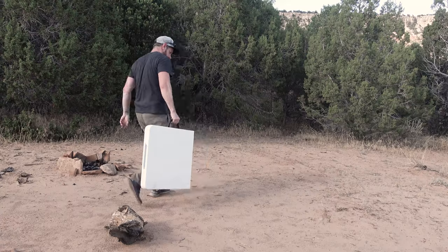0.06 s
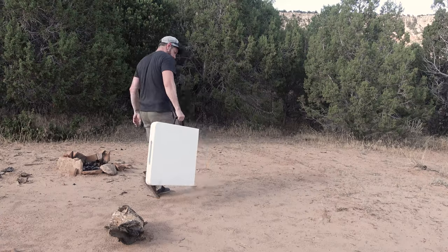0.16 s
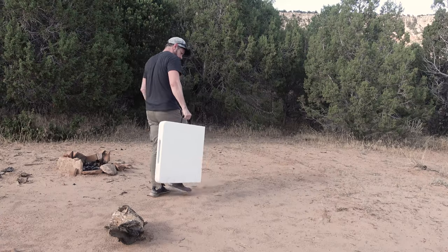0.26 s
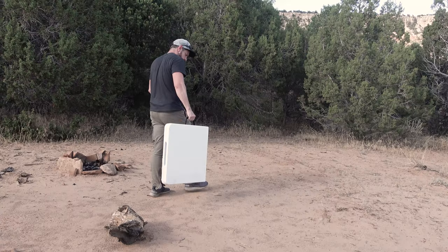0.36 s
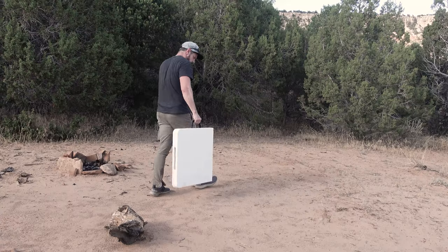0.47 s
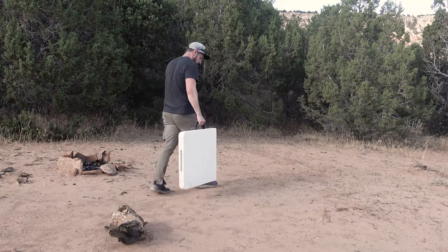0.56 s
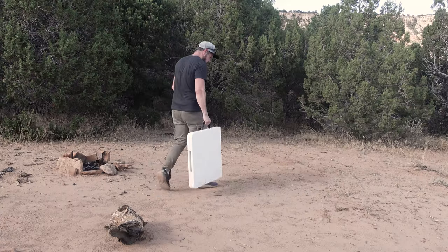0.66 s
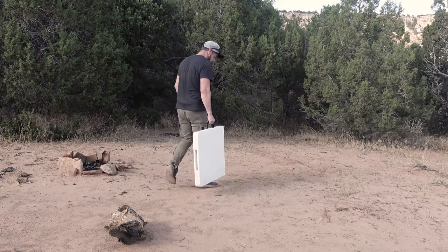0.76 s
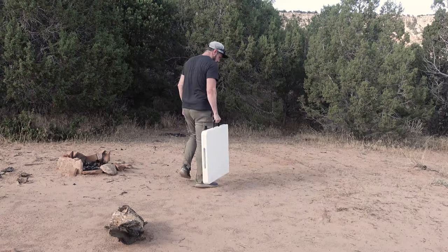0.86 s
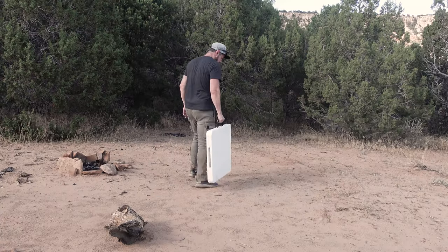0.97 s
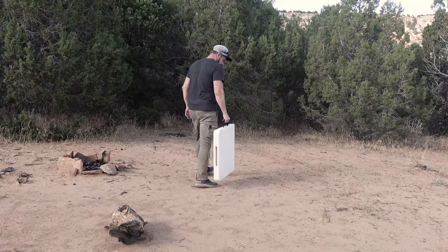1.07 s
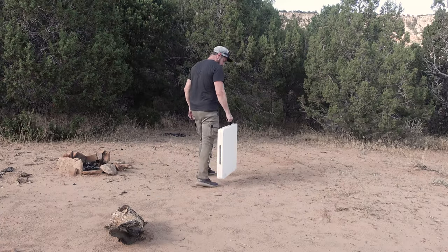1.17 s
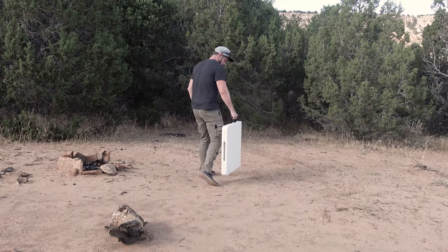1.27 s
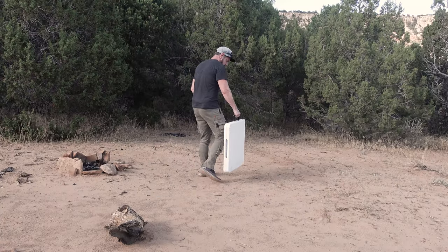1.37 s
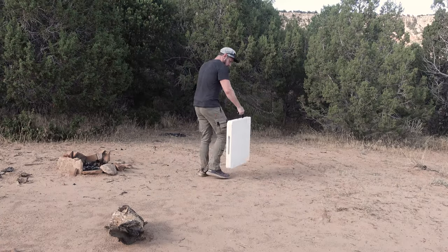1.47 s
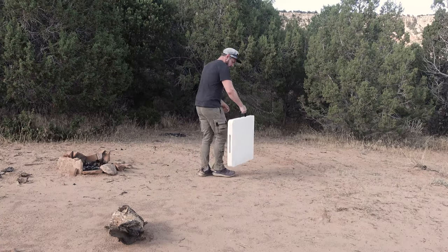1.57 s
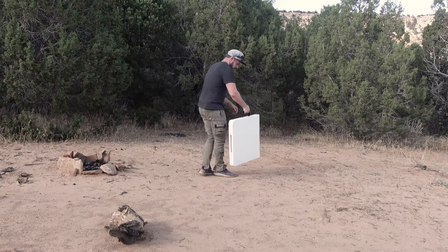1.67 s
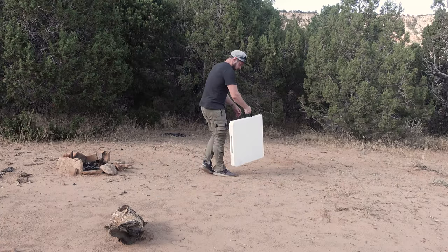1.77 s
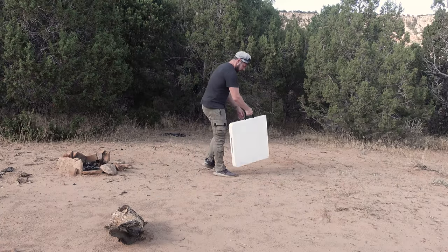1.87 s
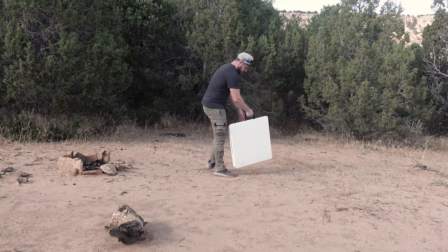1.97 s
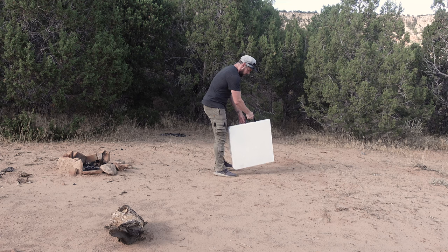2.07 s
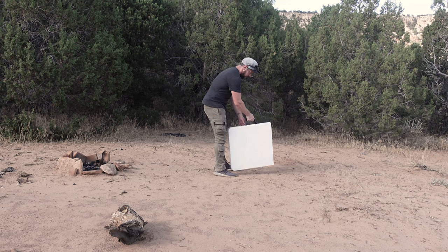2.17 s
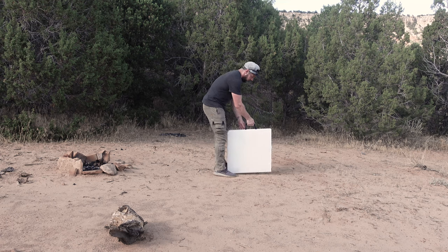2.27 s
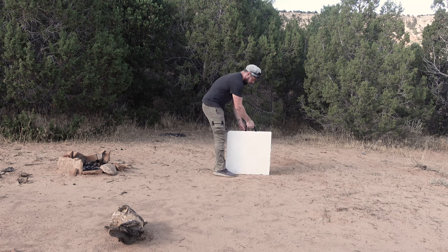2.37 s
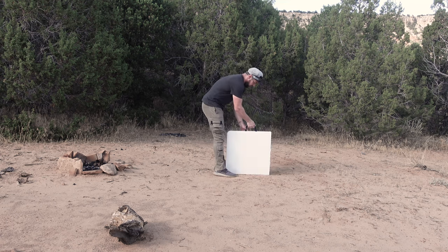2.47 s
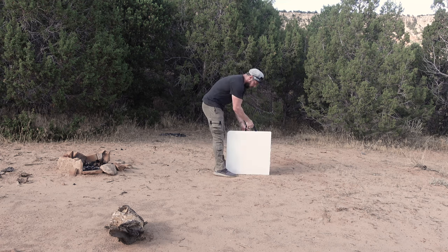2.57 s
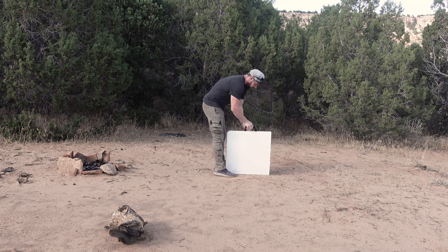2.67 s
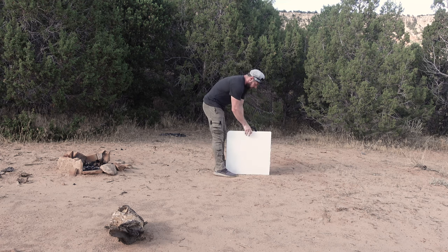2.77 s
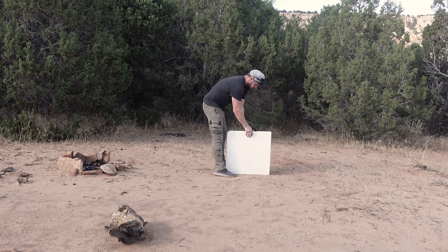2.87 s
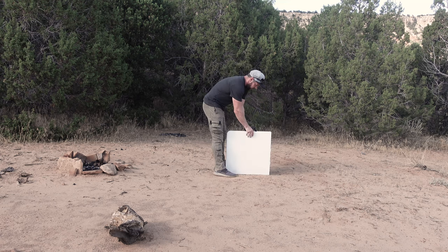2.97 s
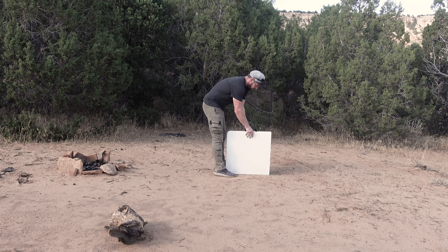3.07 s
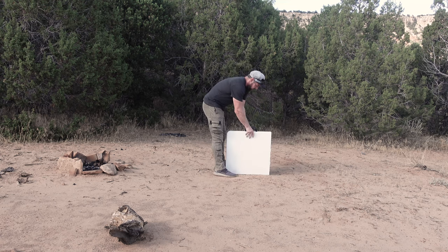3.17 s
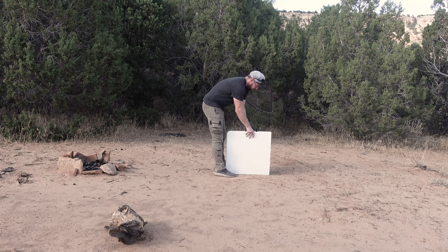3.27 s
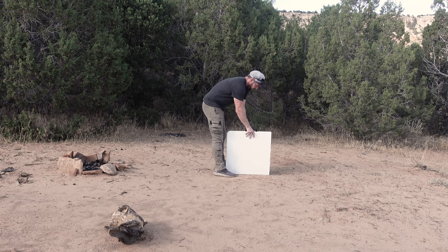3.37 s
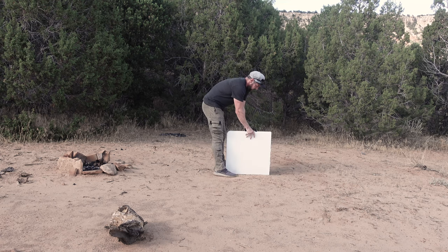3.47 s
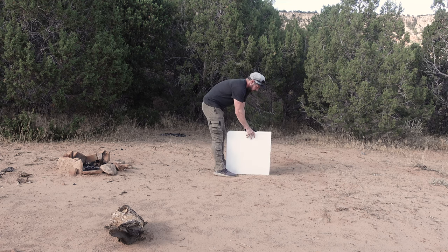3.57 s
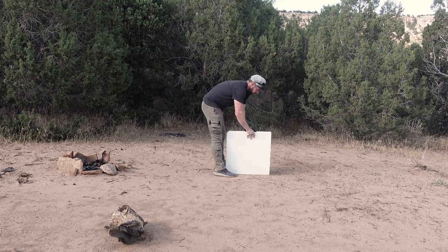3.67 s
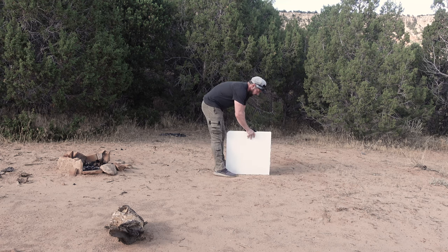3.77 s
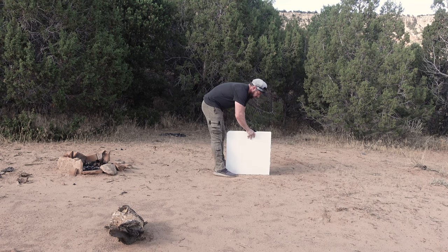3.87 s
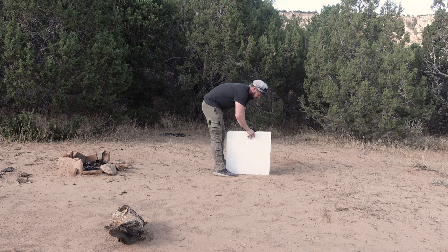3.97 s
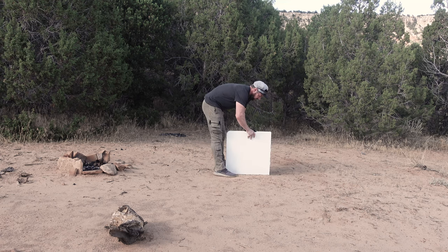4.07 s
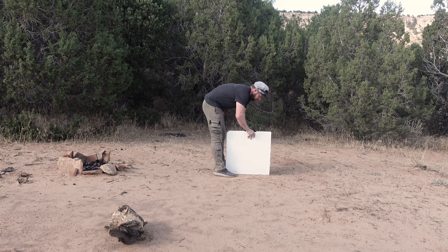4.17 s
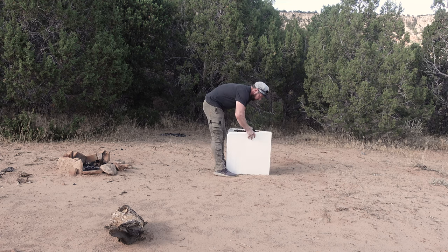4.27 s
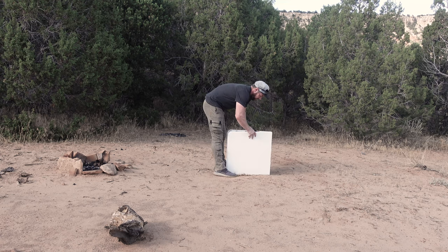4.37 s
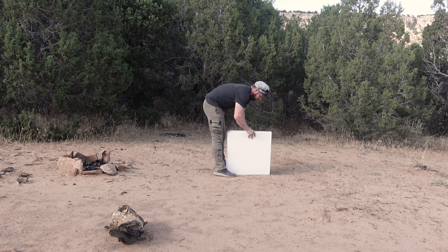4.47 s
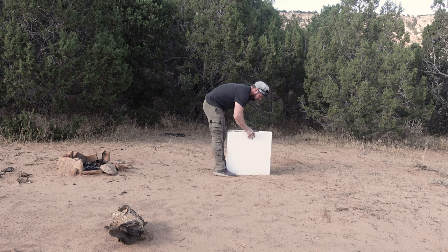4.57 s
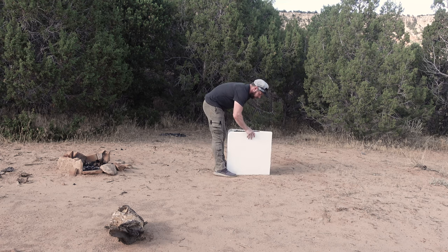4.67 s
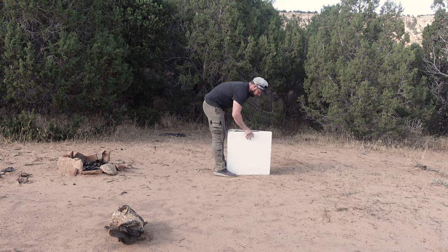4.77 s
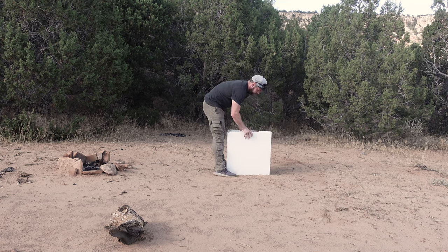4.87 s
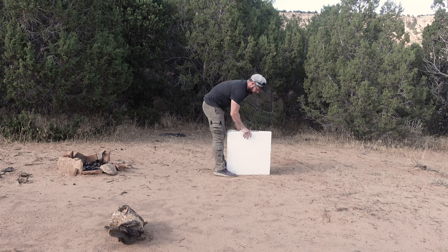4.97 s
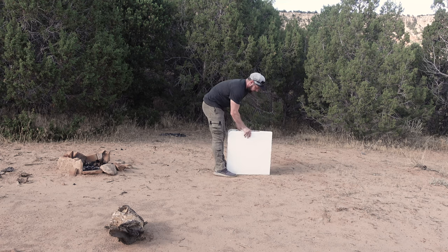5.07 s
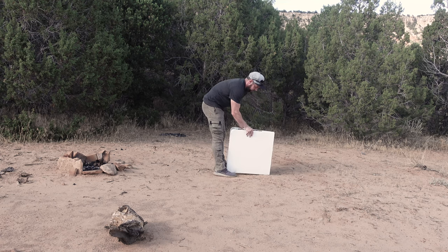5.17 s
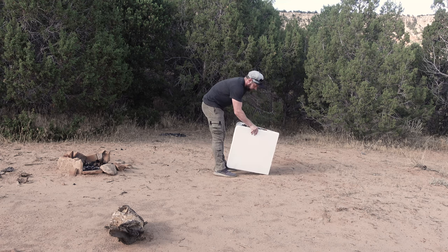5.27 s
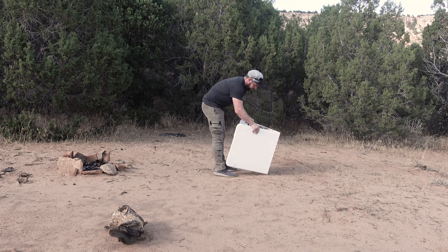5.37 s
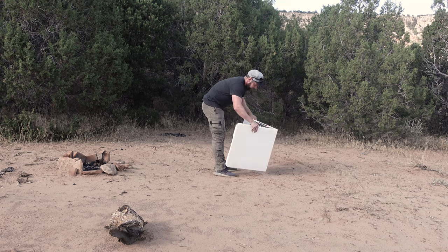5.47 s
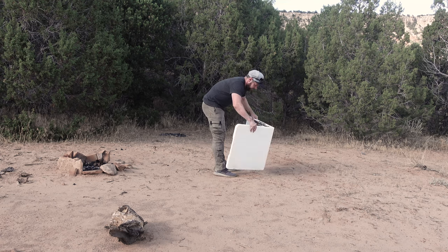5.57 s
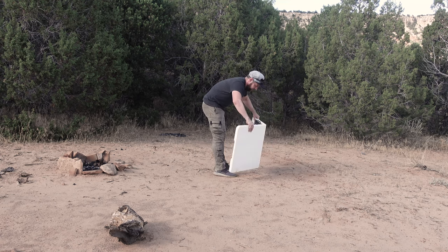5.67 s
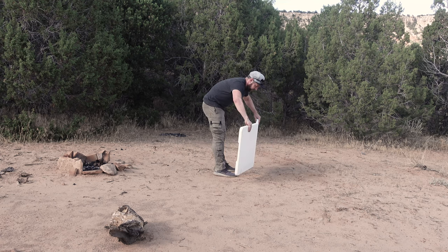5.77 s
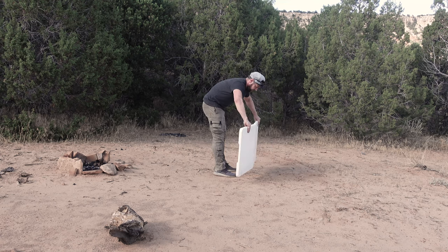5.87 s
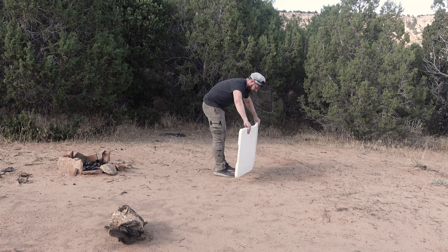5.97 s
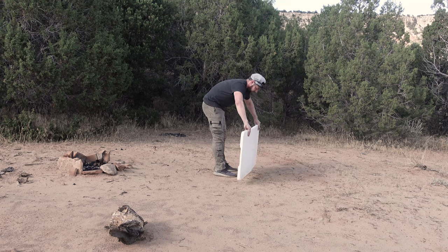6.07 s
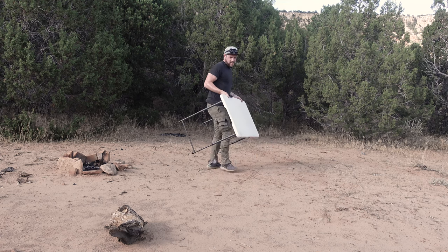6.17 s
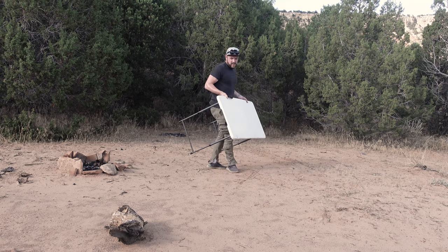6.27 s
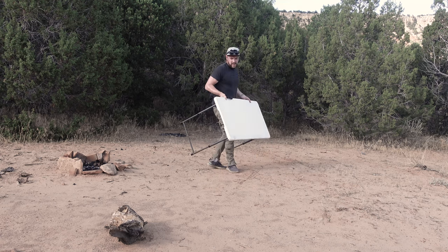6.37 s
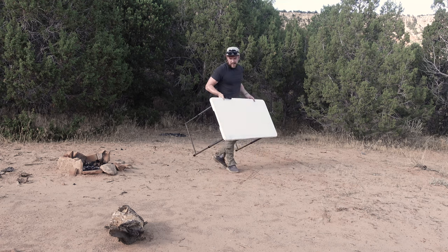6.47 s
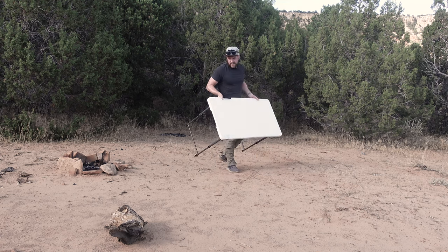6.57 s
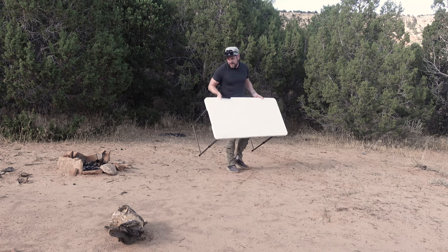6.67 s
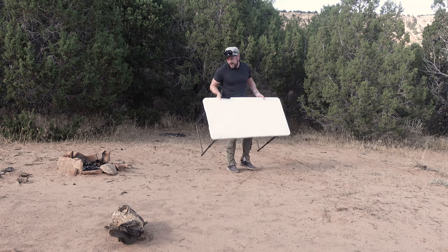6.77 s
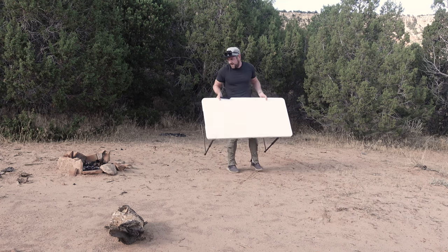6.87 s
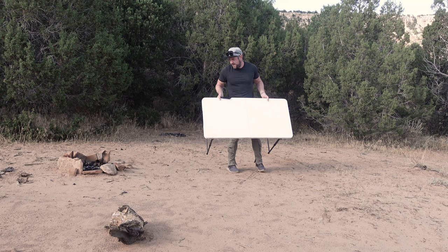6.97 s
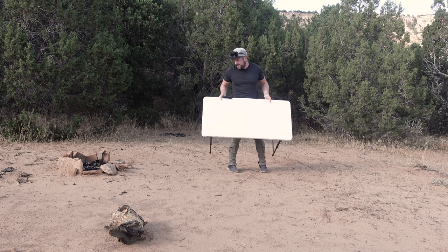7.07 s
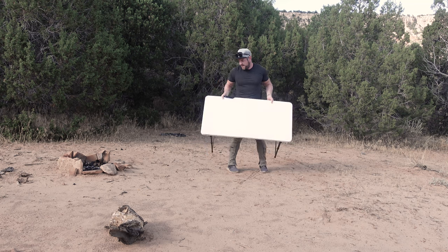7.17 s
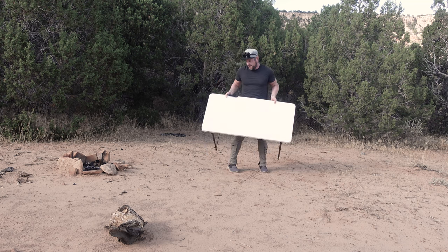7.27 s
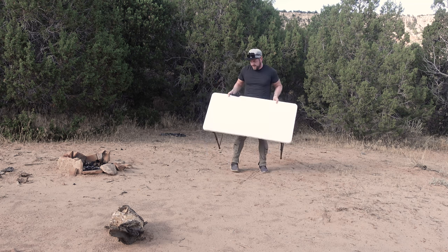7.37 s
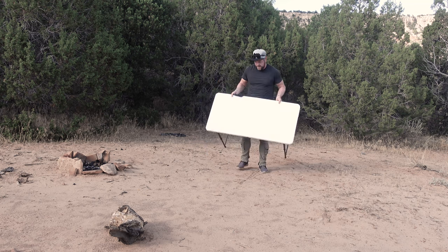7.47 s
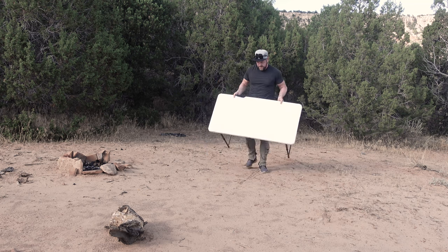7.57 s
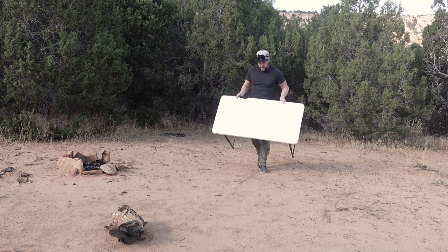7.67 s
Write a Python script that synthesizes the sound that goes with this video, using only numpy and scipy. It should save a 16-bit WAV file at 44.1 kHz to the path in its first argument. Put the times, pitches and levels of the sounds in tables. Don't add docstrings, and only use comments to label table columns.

```python
import sys
import numpy as np
from scipy import signal
from scipy.fft import rfft, irfft, next_fast_len
from scipy.io import wavfile
from scipy.ndimage import uniform_filter1d

SR = 44100
rng = np.random.default_rng(int(sys.argv[2]) if len(sys.argv) > 2 else 0)


def log_audio(samples):
    frames = np.atleast_2d(samples).T
    limited = np.clip(frames, -1, 1)
    pcm = np.round(limited * 32767).astype(np.int16)
    wavfile.write(sys.argv[1], SR, pcm)


def ratio_of_db(decibels):
    return 10 ** (np.asarray(decibels, float) / 20)


N = 340452
TIME = np.arange(N) / SR

SCENE_CHANGES = [
    .089,
    6.195,
]
# t/s, level/dB
BREEZE = [(.1, -1), (1.5, -.5), (3, 1.5), (4.2, -1), (6.2, 0.2627), (7, -1.5), (7.72, -2)]
# f/Hz, density/dB per Hz
SCRUB_MID = [(15, -83), (25, -46), (53, -29), (180, -8), (293, -8.5), (463, -8.5), (516, -7.5), (575, -9),
             (695, -13), (988, -18.5), (1230, -16), (1370, -17.5), (2480, -23.5), (3080, -26.5),
             (16000, -37.5)]
# f/Hz, density/dB per Hz
SCRUB_SIDE = [(15, -81), (25, -32), (175, -1.5), (270, 0.5), (309, -11.5), (354, -0.5), (863, -5.5),
              (936, -9), (1130, -8), (1440, -6.5), (2550, -18), (10100, -31.5), (16000, -43)]
# f/Hz, width/Hz, level/dB
HUM = [(467.55, 30.51, -65.5), (575.74, 67, -71), (679.83, 40, -73.5), (975.92, 67, -74.5),
       (1397.4, 50, -75)]
# peak t/s, 10 dB swell/s, 10 dB fade/s, level/dB
PUFFS = [(.004, .05, .045, -35), (.055, .03, .03, -44), (2.98, .08, .08, -67), (4.332, .012, .03, -42),
         (4.58, .08, .12, -58), (5.03, .1, .1, -65), (5.9, .03, .127, -58), (6.185, .02, .3, -56),
         (6.31, .04, .2, -55), (6.45, .04, .13, -51), (6.66, .06, .05, -57), (6.708, .03, .05, -49),
         (6.796, .035, .05, -53), (6.914, .06, .06, -56), (7.08, .1, .08, -64), (7.354, .03, .03, -63),
         (7.44, .04, .04, -60), (7.605, .03, .035, -54), (7.68, .03, .05, -65)]
# f/Hz, density/dB per Hz
PUFF_COLOUR = [(15, -70), (25, -31), (66, -1), (86, 0), (162, 2), (267, -8.5), (375, -17.5), (500, -13),
               (650, -44), (1100, -120)]
# peak t/s, 10 dB swell/s, 10 dB fade/s, level/dB, treble/dB
SAND = [(.612, 0.1292, 0.1372, -59, -3), (1.15, .015, .04, -70, 0.5), (1.22, .04, .05, -69, -6),
        (1.35, 0.2184, 0.196, -64, -5), (1.67, .025, .05, -63, -3), (1.715, .02, .04, -62, -3.5),
        (1.84, .025, .012, -64, -2), (2.845, 0.0839, 0.113, -65.5, -13),
        (3.005, 0.1679, 0.1994, -64.5, -14), (3.716, 0.0593, 0.04, -54, -11),
        (4.015, 0.1549, 0.1662, -67, -13.5), (4.535, .006, .02, -50, -7), (4.595, .012, .018, -46, -6.5),
        (6.315, .015, .12, -59, -5.5), (6.53, .04, .04, -66, -3), (1.775, .04, .04, -67, -3),
        (4.56, .02, .03, -54, -9), (4.71, 0.0207, 0.0987, -61, -10), (4.956, 0.1438, 0.1853, -53.5, -5.5),
        (5.31, 0.0751, 0.0644, -60, -7), (7.29, .1, .03, -70.5, -8.5), (7.39, 0.0922, 0.0307, -66, -2)]
# f/Hz, density/dB per Hz
GRAIN_COLOUR = [(500, 5.5), (1200, -1.5), (2000, 1), (2800, 4.5), (3300, -1), (4200, -7), (7000, -15.5),
                (12000, -21.5)]
# t/s, peak level/dB, centre f/Hz
SNAPS = [(.55, -55, 5000), (1.15, -58, 3988), (1.281, -50, 2200), (1.369, -53, 2988), (1.65, -58, 6000),
         (1.71, -50, 2979), (1.841, -49, 5015), (2.252, -49.5, 2501), (2.462, -32, 5007),
         (3.277, -48, 3000), (4.703, -49, 3002), (5.079, -50.5, 3487), (5.709, -43.5, 3504),
         (5.835, -52, 3950), (5.998, -34, 5500), (6.31, -56, 3492), (6.72, -55, 3483)]
# t/s, peak level/dB, centre f/Hz, width/octaves, t60/s
TICKS = [(0.0139, -27.5, 5500, 1.2, .012), (0.017, -25, 3568, 1.004, 0.03643),
         (.016, -32, 900, 0.745, 0.02658), (4.4, -22.5, 2400, 0.2165, 0.0367),
         (.082, -45.5, 4209, 0.413, 0.01463), (2.842, -42.5, 976.1, 0.965, 0.1195),
         (2.995, -38.5, 1079, 0.7397, 0.09136), (2.995, -48, 2600, 0.836, .04),
         (4.492, -34.5, 4600, 0.863, 0.03163), (4.512, -46, 4579, 0.0657, 0.1214),
         (5.878, -27.5, 5580, 0.1798, 0.0395), (5.884, -24.5, 5500, 0.1743, 0.0422),
         (6.178, -34.5, 4303, 0.1614, .08), (6.188, -36.5, 4250, 0.258, .048),
         (6.182, -43.5, 6200, 0.1361, .08), (5.836, -47, 2263, .7, .06),
         (5.929, -44.5, 4198, 0.893, 0.2414)]
# peak t/s, 10 dB swell/s, 10 dB fade/s, level/dB
CREAKS = [
    (4.87, .03, .166, -64),
    (4.99, .04, .04, -66),
    (5.29, .03, .04, -63),
    (5.325, .03, .03, -61),
]
# f/Hz, width/Hz, level/dB
HINGE_MODES = [(1574.1, 143, 0), (2473.4, 199.4, -3.5), (3320, 354, -1)]
# t/s, hold/s, steel level/dB, boom/dB over steel, grit/dB over steel
SCRAPES = [(-.006, 0.01707, -46, -7, 4), (0.007, 0.0034, -41, -9, 2), (.03, 0.0581, -59.5, -7.5, 3),
           (2.385, 0.01828, -39.5, -11.5, -6), (2.404, 0.07, -37.5, -2.5, -6.5),
           (2.491, 0.043, -52, 3, -2.5), (2.557, 0.12543, -62, 2.5, -4.5), (4.2394, 0.011, -25, -5.5, -7.5),
           (4.275, .025, -41, -8, -7), (4.316, 0.06, -31.5, -8, -1.5), (4.397, 0.011, -33, -3, -5),
           (4.445, 0.01583, -34, 0.5, -2), (4.49, 0.11173, -47.5, 0, -4.5),
           (4.619, 0.0791, -58.5, -2, -4.5), (4.86, 0.0774, -58.5, 4.5, -24.5),
           (5.834, 0.04264, -56, -12, -3), (5.874, 0.00834, -28.5, -9, -2), (5.899, 0.026, -42, -9, 4),
           (5.956, 0.0256, -52, -0.5, 8), (5.995, 0.04132, -55.5, -4.5, 5.5), (6.17, .03, -44, -9, 0.5)]
# f/Hz, density/dB per Hz
RUB_COLOUR = [(290, -18), (500, -26.5), (729, 10), (1030, 17), (1510, 2), (3440, -11), (3920, -15.5),
              (4400, -18.5), (7530, -29.5), (12700, -38.5), (16000, -44)]
# t/s, peak level/dB, ring f/Hz
JINGLES = [(5.9093, -26, 2889), (5.9237, -28, 3268), (5.932, -25, 3320), (5.9519, -28.5, 3320),
           (5.9646, -27.5, 3444), (5.9699, -28.5, 3488), (5.9775, -32.5, 3441), (5.998, -28, 3472),
           (6.0103, -36.5, 3322), (6.0165, -31, 3340), (6.035, -39.5, 3346)]
# t/s, peak level/dB, start f/Hz, sag/Hz per s, t60/s
BENDS = [
    (4.25, -26, 1110, 4000, .09),
    (4.56, -49, 1050, -5000, .05),
]
# t/s, peak level/dB, f/Hz, t60/s, swell/ms
PINGS = [(0.0139, -8, 3806, 0.002555, 0.04744), (.0153, -12.5, 3719, 0.00456, 0.0484),
         (.016, -29, 3848, 0.04755, 0.299), (.016, -33, 873, 0.02747, 0.937),
         (.016, -31, 2262, 0.0154, 0.303), (0.0811, -40.5, 4217, 0.01123, 0.757),
         (2.4705, -32, 2359, 0.0221, 0.928), (2.504, -38, 601.7, 0.04387, 2.76),
         (2.52, -42, 299.6, 0.09164, 5.04), (4.2394, -12, 1700, 0.005, .05),
         (4.244, -28.5, 1330, 0.0478, 1.93), (4.266, -26.5, 1087, 0.03966, 3.076),
         (4.3965, -11, 2356, 0.0284, .3), (4.397, -16, 1907, 0.01544, 0.33),
         (4.3975, -16.5, 822.5, 0.01619, 0.437), (4.447, -17.5, 1015, 0.02337, 0.528),
         (4.453, -38, 7418, 0.01303, 0.954), (4.49, -42, 5397, 0.02085, 1.01),
         (4.513, -41, 2274, 0.01954, 0.989), (4.5306, -32.5, 1185, 0.01954, .5),
         (4.571, -37, 1154, 0.02837, 2.966), (4.905, -47, 189.5, 0.1002, 4.58),
         (5.085, -51.5, 199.4, 0.083, 3.93), (5.235, -54.5, 446.5, 0.0737, 3.814),
         (5.65, -52, 189.7, 0.1586, 10.09), (5.877, -25, 2637, 0.02725, 2.04),
         (5.8885, -18, 2350, 0.02816, 0.4416), (5.888, -21, 2784, 0.02384, 0.3226),
         (5.888, -16.5, 1803, 0.00437, 0.0507), (5.922, -41, 4330, 0.0826, 3.99),
         (5.958, -44.5, 4330, 0.0908, 4.056), (4.442, -21.5, 4305, 0.003666, 0.049),
         (4.452, -26, 700.8, 0.02864, 1.085), (4.41, -30, 401.5, 0.0382, 2.893),
         (6.1813, -26, 1700, 0.00367, .05), (2.428, -33, 1143, 0.0487, 2.14), (4.25, -27, 794.7, .05, 3),
         (4.335, -25.5, 647.7, 0.03387, 2.019), (4.446, -23, 2595, 0.0205, 1.12),
         (4.2394, -21, 2600, .008, .05), (.014, -29, 3200, .02, .2), (.014, -28, 4650, .02, .2),
             (.005, -36, 400, .03, 1.2), (.04, -47, 3900, .03, 2.2), (5.856, -52, 2280, .06, 4),
             (5.89, -29, 3800, .015, .5), (5.905, -37, 270, .08, 4), (4.606, -43, 300, .05, 3),
             (5.835, -48, 3850, .015, .3), (5.835, -52, 5300, .02, .3), (4.336, -22, 330, .025, 1.2),
             (4.324, -28, 165, .1, 7), (4.442, -35, 170, .1, 6), (4.374, -30, 300, .1, 5),
             (4.275, -38, 150, .14, 8), (2.452, -33, 175, .1, 8), (2.525, -45, 160, .12, 8),
             (1.843, -50, 800, .02, 1.2), (1.715, -54, 2000, .02, 1.2), (5.0, -54, 2000, .04, 3),
             (4.47, -30, 960, .03, 2.2)]
# f/Hz, width/Hz, level/dB
TOP_MODES = [(245.66, 47, 2), (303.52, 58.89, 3.5), (434.24, 160, -2), (541.54, 259.33, -4.5),
             (620.5, 167.97, -15)]
# f/Hz, level/dB, t60/s
STEEL_MODES = [(816.89, -9.5, 0.15), (1060, -11, 0.24), (1366.3, -5, 0.07), (1630.3, -4, 0.041),
               (1862.3, -6, 0.02), (2118.6, -2, 0.019), (2400, -3.5, 0.016), (2774.6, -7, 0.03543),
               (3098.3, -7.5, 0.016), (3615, -14, 0.0407), (4314.3, -5, 0.072), (5500, 4.5, 0.0335),
               (6200, -16, 0.04029), (7521.7, 9.5, .04)]
# t/s, peak level/dB, main ring f/Hz, treble/dB, focus on the ring/dB per octave
CLACKS = [(2.393, -36, 1605, -15, -4.5), (2.427, -23.5, 1133, -24.5, 27.5), (2.449, -24.5, 1226, -22.5, 5),
          (2.464, -27.5, 1293, -10.5, 3), (4.2396, -16, 1388, -17, -3), (4.254, -20.5, 1060, -28, 30),
          (4.276, -25, 1209, -14, -3), (4.32, -24, 975, -4, -5.5), (4.3965, -10, 1718, -15.5, -1),
          (4.443, -15, 2429, -13, 1.5), (4.447, -20, 990.5, -21, 2), (4.453, -21, 1199, -15, 5),
          (4.471, -26, 1163, -19, 0), (4.533, -32, 2231, -14.5, -2.5), (4.57, -43, 1166, -26.5, 25.5),
          (4.591, -31.5, 1556, -16, 4.5), (5.8744, -25, 2255, -12.5, 11), (5.888, -15.5, 2274, -11.5, -1),
          (5.897, -20, 1994, -20, 0.5), (5.907, -23.5, 1505, -14, -0.5), (6.175, -27.5, 2254, -18, 31.5),
          (6.181, -26.5, 2604, -7.5, 1), (6.19, -30, 3155, -18, 3)]
# t/s, peak level/dB, f/Hz, push/ms
THUMPS = [(2.39, -35, 358.9, 3.215), (2.41, -25, 313.9, 3.88), (2.434, -32, 353.6, 3.92),
          (2.456, -21.5, 306.8, 2.376), (2.449, -21.5, 356.5, 5.31), (2.4715, -20.5, 309.9, 2.923),
          (2.499, -37, 217.7, 3.646), (2.85, -34, 328.8, 1.05), (3.015, -38, 317.6, 2.302),
          (3.359, -43.5, 300.5, 5.64), (4.2392, -14, 362.4, .8), (4.2575, -14, 318, 8.53),
          (4.295, -24, 311.2, 4.444), (4.331, -20.5, 243.8, 2.644), (4.3958, -14.5, 285, 1.377),
          (4.416, -26, 250, 2.967), (4.448, -31.5, 378.1, 3.974), (4.466, -28.5, 216.1, 2.88),
          (4.497, -30, 285, 6.61), (4.514, -28, 293, 3.72), (4.793, -42.5, 240.7, 2.34),
          (4.873, -48, 265.4, 3.31), (4.987, -43.5, 264, 2.24), (5.885, -37, 245.6, 4.27),
          (5.917, -39, 428.7, 2.165), (5.947, -43.5, 246.3, 4.6), (6.18, -42, 509.5, 4.04)]


def noise(*shape):
    return rng.standard_normal(shape)


def unit(x):
    return x / np.sqrt(np.mean(x ** 2))


def colour(x, points):
    hz, db = np.transpose(points)
    size = next_fast_len(len(x))
    f = np.arange(size // 2 + 1) * SR / size + 1
    gain = ratio_of_db(np.interp(np.log(f), np.log(hz), db))
    return unit(irfft(rfft(x, size) * gain, size)[:len(x)])


def band(x, lo_hz, hi_hz):
    edges_hz = [lo_hz, min(hi_hz, .45 * SR)]
    return signal.sosfilt(signal.butter(2, edges_hz, "bandpass", fs=SR, output="sos"), x)


def walk(rate):
    k = int(SR / rate)
    held = np.repeat(noise(N // k + 1), k)[:N]
    return unit(uniform_filter1d(uniform_filter1d(held, k), k))


def crackle(length, spread_db):
    size = np.minimum(rng.exponential(size=length), 5)
    return unit(noise(length) * ratio_of_db(spread_db * size))


def decay(t, t60):
    return np.exp(-np.log(1000) * t / t60)


def ring(t, hz, t60):
    return np.sin(2 * np.pi * hz * t) * decay(t, t60)


def shot_end(s):
    return min([c for c in SCENE_CHANGES if c > s] + [N / SR])


def shot(s):
    return TIME < shot_end(s)


def add(out, s, sound, db):
    i = int(s * SR)
    n = min(len(sound), int(shot_end(s) * SR) - i)
    out[i:i + n] += ratio_of_db(db) * sound[:n] / np.abs(sound).max()


def swell(s, rise_s, fall_s, db):
    gain = np.zeros(N)
    near = slice(max(int((s - 5 * rise_s) * SR), 0), int((s + 5 * fall_s) * SR))
    drop = np.maximum((s - TIME[near]) / rise_s, (TIME[near] - s) / fall_s)
    gain[near] = ratio_of_db(db - 10 * drop)
    return gain * shot(s)


def bushes():
    db = np.interp(TIME, *np.transpose(BREEZE))
    leaf_db = -1 - .7 * db
    db, leaf_db = np.where(shot(0), [[-3], [15]], [db, leaf_db])
    mid = ratio_of_db(-59) * colour(noise(N), SCRUB_MID)
    side = ratio_of_db(-62.5) * colour(noise(N), SCRUB_SIDE)
    for hz, width_hz, hum_db in HUM:
        tone = unit(band(noise(N), hz - width_hz / 2, hz + width_hz / 2))
        mid += ratio_of_db(hum_db + 1.1715 * walk(3.2)) * tone
    pair = np.array([mid, side])
    low = signal.sosfilt(signal.butter(1, 1200, fs=SR, output="sos"), pair)
    leaves = (pair - low) * ratio_of_db(leaf_db + 0.21 * walk(12))
    mid, side = (low * ratio_of_db(walk(7.2)) + leaves) * ratio_of_db(db)
    return np.array([mid + side, mid - side])


def puffs():
    mid, side = (colour(noise(N), PUFF_COLOUR) * ratio_of_db(1.4 * walk(25)) for _ in range(2))
    ports = mid * ratio_of_db(np.array([[-.8], [.8]])) + ratio_of_db(-8.5) * side * np.array([[1], [-1]])
    return sum(swell(*puff) for puff in PUFFS) * ports


def strokes():
    attack_s, release_t60_s, settle_db, settle_t60_s = .006, 0.19315, -24, 1.2
    power = np.zeros((3, N))
    for s, hold_s, db, boom_db, grit_db in SCRAPES:
        near = slice(max(int(s * SR), 0), int(s * SR) + SR)
        after = np.maximum(TIME[near] - s - hold_s, 0)
        fade = ratio_of_db(-60 * after / release_t60_s) + ratio_of_db(settle_db - 60 * after / settle_t60_s)
        gain = np.clip((TIME[near] - s) / attack_s, 0, 1) * fade * shot(s)[near]
        levels = ratio_of_db(db + np.array([[0], [boom_db], [grit_db]]))
        power[:, near] += (levels * gain) ** 2
    return np.sqrt(power)


def ground():
    boom = strokes()[1]
    shake = np.roll(uniform_filter1d(boom, SR // 20), int(.025 * SR))
    return ratio_of_db(-28.5) * shake * unit(band(noise(2, N), 26, 60))


def sand():
    grains = colour(crackle(N, spread_db=2.5) * ratio_of_db(1.1 * walk(60)), GRAIN_COLOUR)
    coarse = unit(band(band(grains, 660, 3700), 560, 3900))
    fine = unit(band(grains, 3257.3, 11000))
    return sum(swell(*step[:4]) * (coarse + ratio_of_db(step[4]) * fine) for step in SAND)


def ticks():
    out, t = np.zeros(N), TIME[:SR // 12]
    snaps = [(*snap, 1.224, 0.03213) for snap in SNAPS]
    for s, db, hz, octaves, t60 in [*TICKS, *snaps]:
        force = noise(len(t)) * decay(t, t60)
        force[0] += 2.5
        half = 2 ** (octaves / 2)
        add(out, s, band(force, hz / half, hz * half), db)
    return out


def hinge():
    slip = crackle(N, spread_db=3)
    body = unit(sum(ratio_of_db(db) * unit(band(slip, hz - w / 2, hz + w / 2)) for hz, w, db in HINGE_MODES))
    return body * sum(swell(*creak) for creak in CREAKS)


def scrapes():
    slip = unit(crackle(N, spread_db=1) * ratio_of_db(1.5 * walk(150)))
    rub = colour(slip, RUB_COLOUR)
    tubes = unit(sum(ratio_of_db(db) * band(slip, hz - 2.9 / t60, hz + 3.5 / t60)
                     for hz, db, t60 in STEEL_MODES if hz < 2600))
    panel = sum(ratio_of_db(db) * band(slip, hz - w / 2, hz + w / 2) for hz, w, db in TOP_MODES)
    boom = unit(panel + ratio_of_db(-8.5) * band(slip, 110, 220))
    steel = unit(0.6968 * unit(band(rub, 480, 3800)) + 0.5006 * tubes)
    grit = unit(band(rub, 3815, 14000))
    return np.sum(strokes() * (steel, boom, grit), axis=0)


def jingles():
    out, t = np.zeros(N), TIME[:SR // 20]
    for s, db, hz in JINGLES:
        force = noise(len(t)) * np.exp(-t / 0.003651) * (1 - np.exp(-t / 0.000454))
        force = band(force, 1776, 9570)
        body = ring(t, hz, .0065) + ratio_of_db(-16.5) * ring(t, 4330, 0.02612)
        body += ratio_of_db(-10.5) * ring(t, 4763, 0.004036) + ratio_of_db(-19) * ring(t, 7442, .008)
        add(out, s, signal.fftconvolve(force, body)[:len(t)], db)
    return out


def bends():
    out, t = np.zeros(N), TIME[:SR // 10]
    for s, db, hz, sag_hz, t60 in BENDS:
        add(out, s, ring(t, hz - sag_hz * t / 2, t60) * (1 - np.exp(-t / .004)), db)
    return out


def pings():
    out, t = np.zeros(N), TIME[:SR // 8]
    for s, db, hz, t60, swell_ms in PINGS:
        add(out, s, ring(t, hz, t60) * (1 - np.exp(-t * 1000 / max(swell_ms, .05))), db)
    return out


def clacks():
    out, t = np.zeros(N), TIME[:SR // 6]
    hz, mode_db, t60 = np.transpose(STEEL_MODES)
    for s, db, main_hz, treble_db, focus_db in CLACKS:
        chatter_t60_s = 0.04648 * 1.0267 ** (treble_db + 18) * 0.98564 ** (db + 24)
        force = crackle(len(t), spread_db=1.5) * decay(t, chatter_t60_s)
        force[0] += 4
        push = band(band(force, 199.8, 1.7454 * main_hz), 170, 2.3064 * main_hz)
        level_luck, pitch_luck = noise(2, len(hz))
        near_db = -focus_db * np.abs(np.log2(hz / main_hz)) + 3.5 * level_luck
        struck_db = mode_db + near_db - 2.9 * (hz > 1.1 * main_hz)
        modes = zip(hz * (1 + .05 * pitch_luck), struck_db, t60)
        low = ring(t, main_hz, 0.0277)
        low += sum(ratio_of_db(g - 3.5) * ring(t, f, 0.54 * d) for f, g, d in modes if f < 4000)
        high = sum(ratio_of_db(g) * ring(t, f, 0.37 * d) for f, g, d in STEEL_MODES if f > 4000)
        crack = ratio_of_db(-2.5 - focus_db) * unit(band(push, 0.30755 * main_hz, 1.9 * main_hz))
        add(out, s, unit(signal.fftconvolve(push, low)[:len(t)]) + crack, db)
        tick = unit(signal.fftconvolve(band(force, 2900, 9806), high)[:len(t)])
        tick += 2.6 * unit(band(force, 3600, 7100))
        add(out, s, tick, db + treble_db)
    return out


def thumps():
    out, t = np.zeros(N), TIME[:SR // 4]
    for s, db, hz, push_ms in THUMPS:
        t60 = 0.10812 * 0.97091 ** (db + 30)
        body = ring(t, hz, t60) + ratio_of_db(-7) * ring(t, 1.5368 * hz, 0.456 * t60)
        body += ratio_of_db(-25) * ring(t, 0.604 * hz, 1.7043 * t60)
        for mode_hz, width_hz, mode_db in TOP_MODES:
            body += ratio_of_db(mode_db - 8) * rng.normal() * ring(t, mode_hz, min(t60, 2.6947 / width_hz))
        add(out, s, body * (1 - np.exp(-t * 1000 / push_ms)), db)
    return out


def scene():
    table = thumps() + clacks() + ticks() + jingles() + scrapes() + sand() + pings() + bends()
    table = band(table, 100, 12463)
    t = TIME[:SR // 8]
    smear = noise(2, len(t)) * decay(t, .15)
    smear = band(smear, 420, 14000) / np.sqrt(np.sum(smear ** 2))
    echo = np.zeros((2, N))
    edges = [0] + [int(c * SR) for c in SCENE_CHANGES] + [N]
    for a, b in zip(edges, edges[1:]):
        echo[:, a:b] = signal.fftconvolve(table[None, a:b], smear, axes=1)[:, :b - a]
    direct = table * ratio_of_db(np.array([[-.2], [.2]]))
    return direct + ratio_of_db(-18.5) * echo + ground() + puffs() + bushes() + hinge()


def band_limit(x):
    return signal.sosfilt(signal.butter(12, 16470, fs=SR, output="sos"), x)


def record(dry):
    mix = signal.sosfilt(signal.butter(2, 40, "highpass", fs=SR, output="sos"), dry)
    mix = np.tanh(1.1 * mix) / 1.1
    mix = signal.sosfilt(signal.ellip(10, .2, 60, 15750, fs=SR, output="sos"), mix)
    return band_limit(mix)


dry = scene()
out = record(dry)
log_audio(out)
```